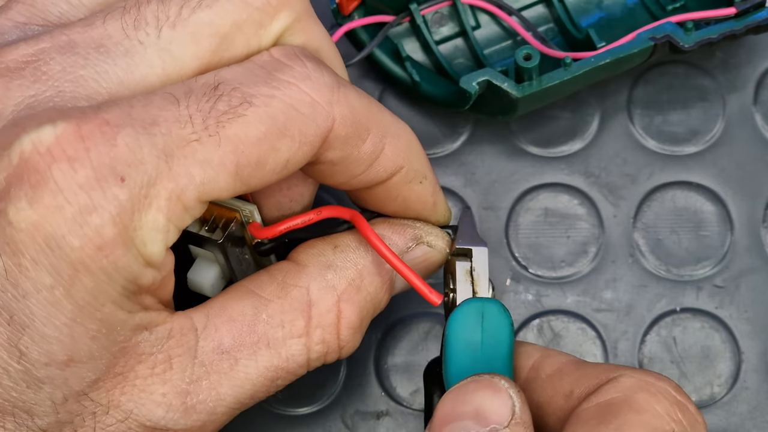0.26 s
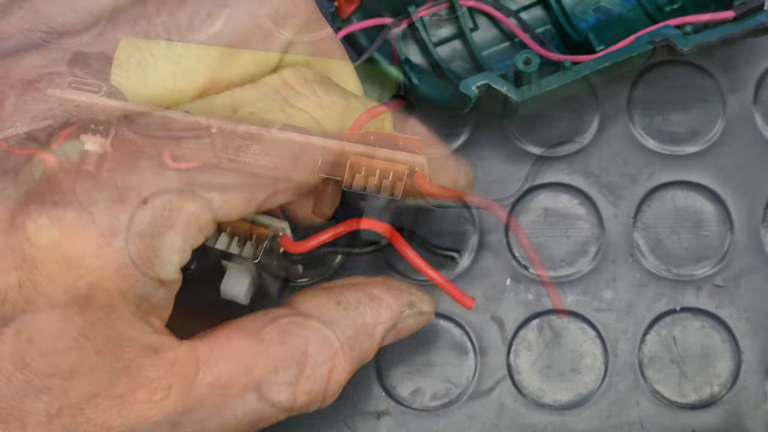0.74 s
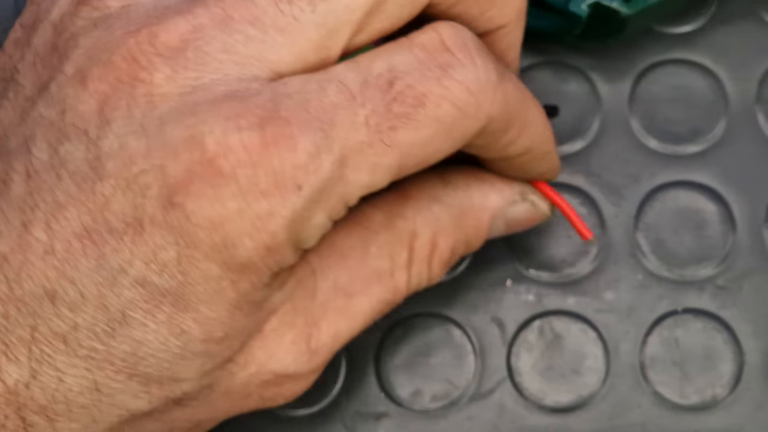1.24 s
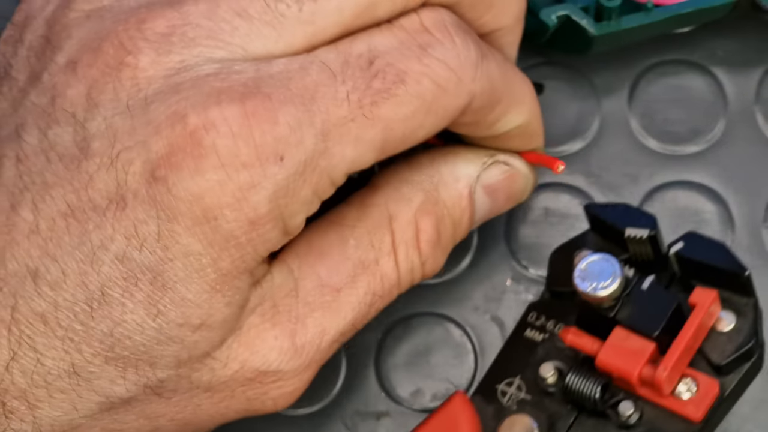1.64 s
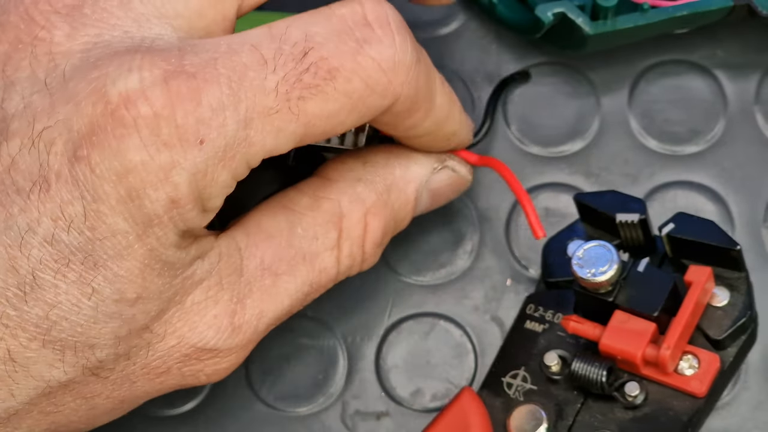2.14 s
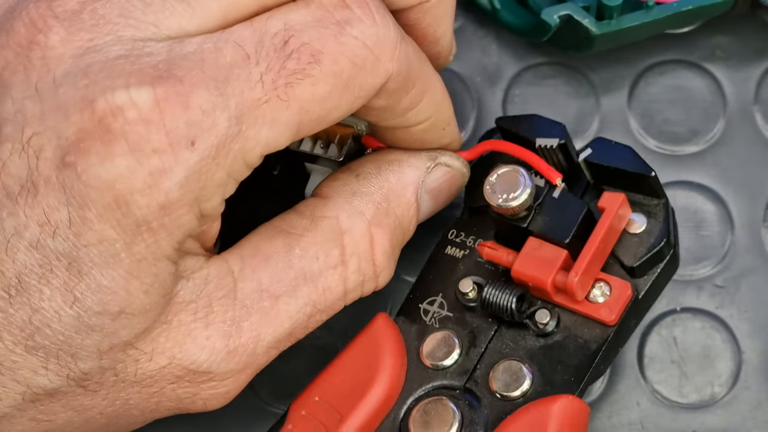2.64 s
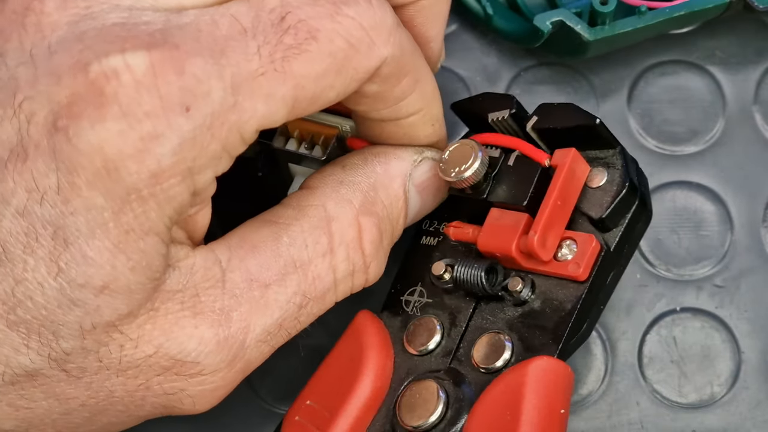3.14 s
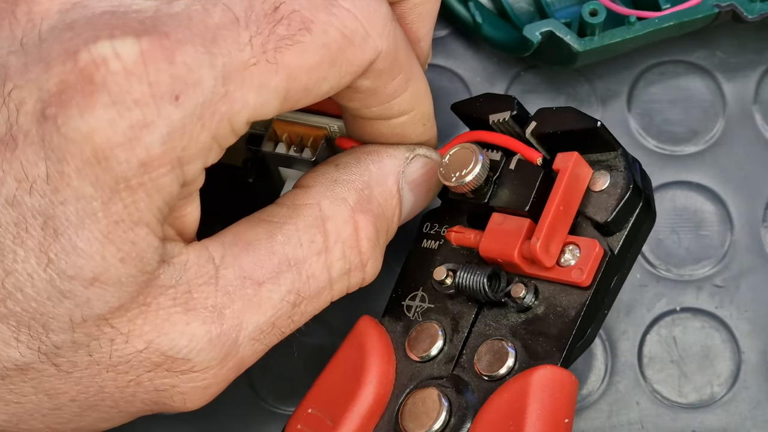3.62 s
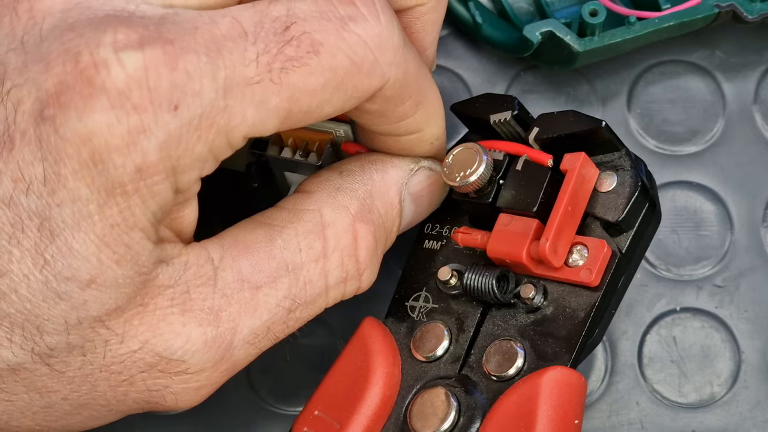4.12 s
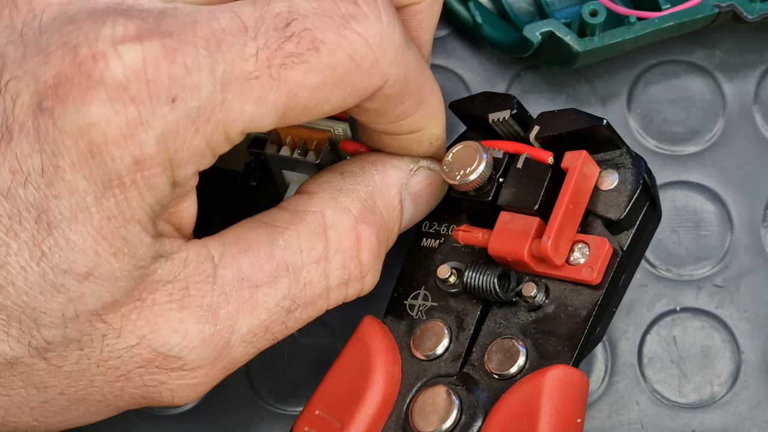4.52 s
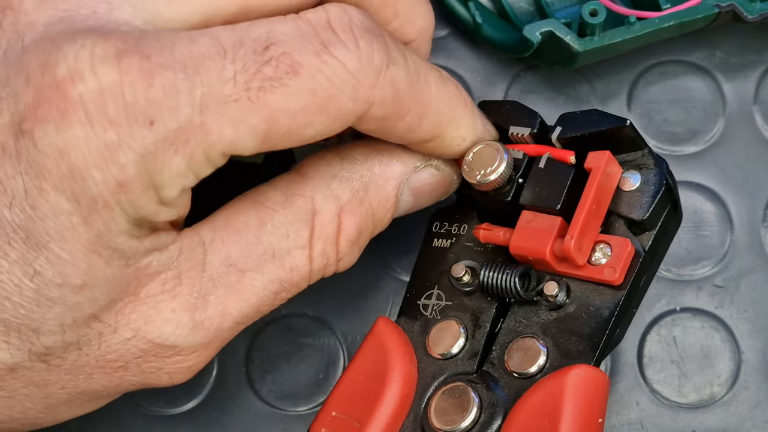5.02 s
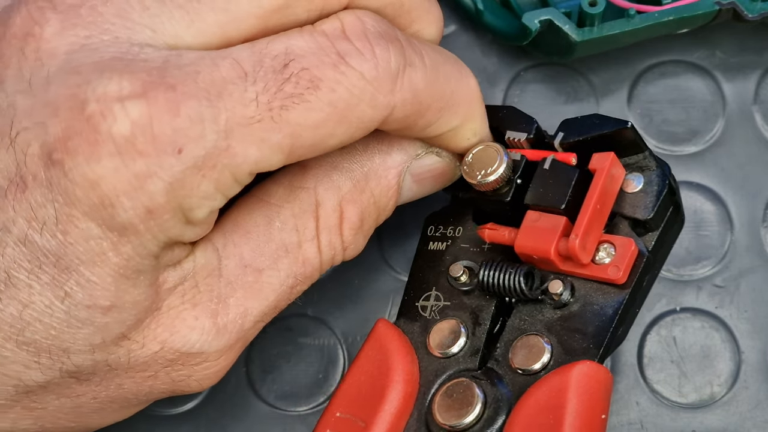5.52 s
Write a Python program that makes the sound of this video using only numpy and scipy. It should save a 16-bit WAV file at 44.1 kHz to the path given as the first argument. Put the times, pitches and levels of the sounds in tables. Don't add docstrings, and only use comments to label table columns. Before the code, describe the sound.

A close stereo microphone hears one crisp cutter snap, then skin and plastic rubbing on rubber, low bench thumps, rustling leads and tiny metal ticks. Midway comes a sharp multiple clack of stripper jaws, followed by near stillness with small spring pings, and finally a violent short snap with rattling steel. Bright reverberation follows the strokes; the steady fan hum and hiss dip after each and slowly return.

```python
import sys
import numpy as np
from scipy import signal
from scipy.fft import rfft, irfft, next_fast_len
from scipy.io import wavfile
from scipy.ndimage import uniform_filter1d, map_coordinates

SR = 44100
rng = np.random.default_rng(int(sys.argv[2]) if len(sys.argv) > 2 else 0)


def level_to_linear(level):
    exponent = np.asarray(level, float) / 20
    return 10 ** exponent


def materialize(psi):
    bounded = np.clip(np.atleast_2d(psi).T, -1, 1)
    quanta = np.round(bounded * 32767).astype(np.int16)
    wavfile.write(sys.argv[1], SR, quanta)


N = 254456

# t/s, peak/dB, ring f/Hz, t60/s, crack level/dB
CUT_HITS = [(.4075, -42, 5300, .04, 2), (.4158, -31, 5440, .012, -2), (.4355, -13, 3996, .01, -14),
            (.4404, -3.5, 4980, .006, 2), (.4425, -14, 4696, .03, -4.5), (.4505, -23, 5110, .012, -3.5),
            (.4555, -21, 4900, .012, -5.5), (.4625, -19, 4800, .01, -6), (.4725, -28, 2100, .04, -7.5),
            (.483, -26, 8500, .06, 3)]
# t/s, peak/dB, ring f/Hz, left-right/dB, crack level/dB
CLAMP_HITS = [(3.0925, -33, 5280, 8.5, -8.5), (3.0965, -29, 3750, 6, -9), (3.1005, -21, 6010, 6, -2),
              (3.1048, -7.5, 2462, 1, -7), (3.1058, -14.5, 6300, 6, 0.5), (3.1089, -11, 5060, 6, 3),
              (3.1122, -5.5, 3720, 6.0, 4), (3.1128, -10.5, 7300, 6, -3.5), (3.1168, -17.5, 2450, 2, 1.5),
              (3.1175, -14.5, 7450, 5, -4), (3.1215, -21.5, 2500, 2, 2.5), (3.1485, -30.5, 7500, 4.5, 1),
              (3.153, -34.5, 2700, 4, 1)]
# t/s, peak/dB, ring f/Hz, left-right/dB, crack level/dB
TEAR_HITS = [(5.6227, -0.5, 6120, 3.5, -9.5), (5.6258, -14.5, 6900, 3, -4), (5.634, -16, 1398, 0.5, -2),
             (5.638, -10, 5246, 5, -3.5), (5.6446, -4.5, 6300, 1.5, 5.5), (5.6492, -7, 3247, 3.5, 5),
             (5.6523, -13.5, 3284, 3.5, 1.5), (5.6548, -15.5, 1786, 2, 2.5), (5.6575, -9.5, 3586, 1.5, 6),
             (5.661, -24, 2395, 2, 2)]
# t/s, peak/dB, ring f/Hz, left-right/dB, crack level/dB
TICK_HITS = [(0.0169, -55, 2630, 13, -9), (.738, -50, 14000, 1, 8), (.8255, -48, 2700, 2, 0),
             (0.9512, -39, 8400, 8, -3.5), (1.1164, -51, 2800, 2, 3), (1.2685, -35.5, 12500, 3.5, -8),
             (1.505, -25, 6040, 1, 4), (1.511, -36, 7550, 2, -2), (2.1735, -40.5, 5800, 12, 0),
             (2.179, -47, 4800, 6, 0), (2.1944, -37, 6400, 10, -5), (2.3491, -47, 3020, 3, 1),
             (2.37, -32, 5430, 1, 19), (2.1948, -47, 13500, 3, 0), (2.3705, -45, 13500, 1, 0),
             (2.7027, -47, 13000, 2, 0), (2.479, -47, 6500, 3, 2.5), (2.4708, -42, 3010, 6.5, -2),
             (2.7023, -41.5, 5040, 4.9, 12), (2.7945, -46, 4150, 14, 13), (2.8525, -41, 2970, 10.5, -2),
             (2.8564, -34, 3500, 10, 9), (2.864, -41, 2860, 10.5, -3), (3.0006, -32, 3234, 3, -1),
             (5.0499, -46, 7800, 3, 3), (5.054, -50, 6200, 3, 0), (5.5223, -37, 5100, 13.5, -10),
             (5.5524, -55, 3000, 10, -1)]
# t/s, peak/dB, ring f/Hz, t60/s, crack level/dB
BUMP_HITS = [(1.7873, -20.5, 3300, 0.025, 5), (2.022, -46, 2200, .03, -3), (2.033, -42, 3400, .02, 0),
             (2.0373, -35.5, 3430, 0.023, -2), (2.043, -38.5, 3030, 0.036, 2.5),
             (.737, -44, 1380, 0.027, -11.5), (4.7336, -37.5, 2948, 0.013, 4), (4.7365, -46, 5200, .015, 1),
             (4.925, -53, 2930, .015, -3), (4.9265, -56, 4800, 0.013, -3), (5.7435, -23, 3100, .012, 4),
             (5.7465, -31, 2660, .025, 7)]
# t/s, peak/dB, long ring level/dB, damping (1 = free)
SPRING_SLIPS = [
    (4.9975, -33, 4, 2.3),
    (5.028, -57, 6, 1.7),
    (5.2029, -34.5, 1, 0.97),
    (5.309, -58, 18, 0.9),
    (5.36, -71, 0, 1.34),
]
# t/s, level/dB, rise/(dB per ms), fall/(dB per ms), left-right/dB
STROKE_SWELLS = [
    (.4375, -10, 1.9, 8.5, 13),
    (3.1125, -13, 2, 3, 5),
    (5.6235, -15, 3, 2.5, 1.5),
    (5.649, -25.5, 0.73, 1.35, 4.5),
    (.424, -36.5, 2.1, 2.5, 6),
]
# f/Hz, width/Hz, level/dB
JAW_MODES = [(1360, 170, -17), (2450, 270, -4.5), (3750, 200, -3.5), (4980, 340, -3.5), (6360, 96, -1),
             (7660, 390, -5), (9000, 260, -7), (13500, 189.8, -20.5), (15000, 210, -16)]
# f/Hz, level/(dB per Hz)
CRACK_TINT = [(180, -56.5), (300, -17.5), (994, -10.5), (1230, -4), (1840, -8), (2100, -5), (6000, -4),
              (13100, -8), (15000, -4.5), (16000, -16)]
# f/Hz, level/(dB per Hz)
CLICK_TINT = [(300, -2.5), (1200, -6), (2300, -5.5), (4000, 3.5), (7000, -3), (9500, -25), (15000, -16.5)]
# f/Hz, level/(dB per Hz)
SCRAPE_TINT = [(180, -29), (300, -5), (480, -9), (750, -11), (1000, -16), (1250, -11.5), (1600, -12),
               (2100, -8.5), (2500, -16), (5000, -28), (6500, -51.5), (11000, -120)]


def unit(x):
    return x / np.sqrt(np.mean(x ** 2) + 1e-20)


def along(points, hz):
    f, v = np.transpose(points)
    return np.interp(np.log(hz + 1), np.log(f + 1), v)


def colour(spectrum):
    return lambda hz: level_to_linear(along(spectrum, hz))


def resonant(modes):
    def response(f):
        total = 0
        for k, (centre, width, db) in enumerate(modes):
            band = 1j * f * width
            total = total + (-1) ** k * level_to_linear(db) * band / (centre ** 2 - f ** 2 + band)
        return total
    return response


def filtered(x, response):
    m = next_fast_len(x.shape[-1] + 8192)
    return irfft(rfft(x, m) * response(np.fft.rfftfreq(m, 1 / SR)), m)[..., :x.shape[-1]]


def wobble(rate):
    knots = rng.standard_normal(int(N * rate / SR) + 4)
    return map_coordinates(knots, [np.arange(N) * rate / SR])


def patches(shape, bins, frames):
    lumps = uniform_filter1d(rng.standard_normal(shape), size=bins, axis=0)
    return unit(uniform_filter1d(lumps, size=frames, axis=1))


def rush(gain, alike, patchy_db):
    z = signal.stft(rng.standard_normal((2, N)), nperseg=512)[2]
    field = patches(z.shape[1:], bins=6, frames=10)
    pair = signal.istft(z * level_to_linear(patchy_db * field), nperseg=512)[1][:, :N]

    def mid_side_gain(hz):
        angle = np.arccos(np.clip(along(alike, hz), -1, 1)) / 2
        return gain(hz) * np.array([np.cos(angle), np.sin(angle)])

    mid, side = filtered(pair, mid_side_gain)
    return unit(np.array([mid + side, mid - side]))


def swells(rows, half_s):
    t = np.arange(N) / SR
    return sum(level_to_linear(db) * np.exp(-((t - s) / half_s) ** 2) for s, db in rows)


def add(track, s, sound):
    part = track[:, round(s * SR):][:, :sound.shape[1]]
    part += sound[:, :part.shape[1]]


def sides(pan_db):
    return level_to_linear([[pan_db / 2], [-pan_db / 2]])


def left_first(pair, samples):
    return np.array([pair[0], np.roll(pair[1], samples)])


def contacts(rows, crack_tint, spread, attack, **shared_by_all):
    out, t = np.zeros((2, N)), np.arange(SR // 16) / SR
    own = [name for name in ("t60", "pan_db", "crack_db") if name not in shared_by_all]
    for s, db, hz, *rest in rows:
        hit = {**shared_by_all, **dict(zip(own, rest))}
        shared, left, right = rng.standard_normal((3, len(t)))
        blow = shared + np.array([left, right])
        mode = resonant([(hz, spread * hz, 0)])
        ring = unit(filtered(blow, lambda f: mode(f) ** 2))
        crack = level_to_linear(hit["crack_db"]) * unit(filtered(blow, colour(crack_tint)))
        sound = (ring + crack) * level_to_linear(-60 * t / hit["t60"]) * (1 - np.exp(-t / attack)) ** 2
        peak = np.abs(sound).max(axis=1, keepdims=True)
        add(out, s - attack, level_to_linear(db) * sound / peak * sides(hit["pan_db"]))
    return out


def stroke_swell(stroke, modes, grit_db):
    s, db, rise, fall, pan_db = stroke
    out, ms = np.zeros((2, N)), np.arange(-SR // 20, SR // 20) / SR * 1000
    shared, left, right = rng.standard_normal((3, len(ms)))
    burst = shared + 0.49 * np.array([left, right])
    grit = level_to_linear(grit_db) * unit(filtered(burst, colour(CRACK_TINT)))
    swell = unit(filtered(burst, resonant(modes))) + grit
    add(out, s - 1 / 20, swell * level_to_linear(db + np.minimum(rise * ms, -fall * ms)) * sides(pan_db))
    return out


def cutter():
    # f/Hz, width/Hz, level/dB
    cutter_modes = [(2270, 150, -21.5), (4100, 130, -13), (4612, 120, -7), (5550, 110, 0), (8610, 83, -1),
                    (11400, 580, -23), (13900, 360, -24), (15200, 160, -12.5)]
    swell = stroke_swell(STROKE_SWELLS[0], cutter_modes, grit_db=-15) + stroke_swell(STROKE_SWELLS[4], cutter_modes, grit_db=-5)
    return swell + contacts(CUT_HITS, CRACK_TINT, spread=0.1, attack=0.00082, pan_db=-2)


def clamp():
    # f/Hz, level/(dB per Hz)
    clamp_tint = [(180, -59), (300, -26.5), (1340, -11.5), (1870, -20), (2440, -1), (2790, -7.5),
                  (7200, -8.5), (16000, -27.5)]
    strikes = contacts(CLAMP_HITS, clamp_tint, spread=0.07, attack=0.00089, t60=0.014)
    return stroke_swell(STROKE_SWELLS[1], JAW_MODES, grit_db=-11) + strikes


def tear():
    # f/Hz, width/Hz, level/dB
    slide_modes = [(1680, 300, -11), (4760, 140, -10), (6230, 190, -1), (6940, 43, -6), (7300, 240, -4.5),
                   (8200, 120, -11), (10700, 200, -19.5), (15200, 190, -24)]
    rip = stroke_swell(STROKE_SWELLS[2], slide_modes, grit_db=-18.5)
    rattle = stroke_swell(STROKE_SWELLS[3], JAW_MODES, grit_db=3.5)
    snap = contacts(TEAR_HITS[:1], CRACK_TINT, spread=0.2, attack=0.00035, t60=0.006)
    strikes = contacts(TEAR_HITS[1:], CRACK_TINT, spread=0.11, attack=0.00037, t60=0.011)
    return rip + rattle + plate() + snap + strikes


def plate():
    out, t = np.zeros((2, N)), np.arange(SR // 8) / SR
    ring = unit(filtered(rng.standard_normal((2, len(t))), resonant([(2154, 70, 0)])))
    level = level_to_linear(-37 - 60 * t / 0.28)
    add(out, TEAR_HITS[-1][0], ring * level * (1 - np.exp(-t / 0.015)))
    return out


def ticks():
    return contacts(TICK_HITS, CLICK_TINT, spread=0.18, attack=0.00041, t60=0.013)


def bumps():
    # f/Hz, level/(dB per Hz)
    bump_tint = [(300, -9), (1200, -6), (2300, -3), (3600, 2.5), (5500, -1.5), (8000, -9), (9500, -20),
                 (15000, -26)]
    return contacts(BUMP_HITS, bump_tint, spread=0.25, attack=0.00033, pan_db=3)


def spring():
    # f/Hz, level/dB, t60/s
    coil_modes = [(1674, -7, 0.18), (2420, -0.5, 0.033), (3505, 10, 0.031), (4220, -6.5, 0.032),
                  (5110, -2.5, 0.031), (5580, -4, 0.039), (6170, -5, 0.018), (2290, -21, 0.18),
                  (2505, -16, 0.12), (3630, -22.5, 0.15), (3340, -21, 0.18), (3680, 5, 0.022),
                  (7300, -8, .015)]
    out, t = np.zeros((2, N)), np.arange(SR // 3) / SR
    for s, db, long_db, damping in SPRING_SLIPS:
        ring = np.zeros(len(t))
        for hz, mode_db, t60 in coil_modes:
            strength_db = mode_db + rng.normal(0, 1) + long_db * (t60 > 0.1)
            wave = np.sin(2 * np.pi * (hz * t + rng.random()))
            ring += level_to_linear(strength_db - 60 * damping * t / t60) * wave
        noise = unit(filtered(rng.standard_normal((2, len(t))), colour(CLICK_TINT)))
        click = level_to_linear(-6 - 60 * t / 0.025) * noise
        add(out, s, level_to_linear(db - 2.5) * (ring + click) * (1 - np.exp(-t / 0.0016)) * sides(4.9))
    return out


def skids():
    # t/s, peak/dB, f/Hz, t60/s, grit level/dB
    skid_hits = [(1.05, -45, 920, 0.059, -15.5), (1.30, -31.5, 1790, 0.55, -11),
                 (1.325, -32, 1230, 0.17, -11), (1.412, -25, 1170, 0.1, -3), (1.424, -30, 1490, .05, 4),
                 (1.44, -29.5, 905, 0.08, -3), (1.452, -32, 1250, 0.069, 3), (1.63, -33, 680, 0.078, 4),
                 (1.787, -24.5, 500, 0.084, 8)]
    return contacts(skid_hits, SCRAPE_TINT, spread=0.45, attack=0.004, pan_db=3)


def knocks():
    # t/s, peak/dB, pitch f/Hz, t60/s, slap level/dB
    soft_knocks = [(0.7375, -16, 228, 0.044, -24), (0.774, -30.5, 167, 0.15, -23),
                   (0.824, -32, 150, 0.11, -23), (.882, -41.5, 194, 0.11, -24),
                   (1.049, -39, 93, 0.046, -14), (1.169, -28.5, 127, 0.14, -8.5),
                   (1.244, -26, 116, 0.038, -20), (1.296, -28, 191, 0.13, -12),
                   (1.364, -22.5, 90, 0.063, -27), (1.643, -29, 106, 0.05, -20),
                   (1.786, -29.5, 286, 0.077, -7), (2.259, -31.5, 210, 0.13, -21.5)]
    # t/s, peak/dB, pitch f/Hz, t60/s, slap level/dB
    tool_jolts = [
        (5.64, -35, 141, 0.14, -22),
        (5.645, -35.5, 42.6, 0.28, -35),
        (5.685, -39, 125, 0.22, -10),
        (5.72, -44.5, 138, 0.21, -20),
    ]
    slap_modes = resonant([(500, 220, -5.5), (1380, 340, -12.5)])
    out, t = np.zeros((2, N)), np.arange(SR // 4) / SR
    for s, db, hz, t60, slap_db in soft_knocks + tool_jolts:
        turn = 2 * np.pi * hz * t
        ring = np.sin(turn) + 0.47 * np.sin(1.59 * turn) + 0.2 * np.sin(2.4 * turn)
        slap = unit(filtered(rng.standard_normal((2, len(t))), slap_modes))
        sound = ring * level_to_linear(-60 * t / t60) + slap * level_to_linear(slap_db + 1 - 60 * t / 0.048)
        add(out, s, level_to_linear(db + 3) * sound * (1 - np.exp(-t / 0.0056)) * sides(1.5))
    return out


def hands():
    # t/s, effort level/dB
    effort = [(.8, -95), (.86, -61.5), (1.01, -57), (1.09, -49.5), (1.28, -40), (1.52, -41), (1.59, -42.5),
              (1.76, -44.5), (1.81, -44.5), (1.97, -50), (2.06, -49.5), (2.14, -53.5), (2.25, -55.5),
              (2.6, -59), (3.08, -59.5), (3.12, -90)]
    # t/s, level/dB
    shoves = [(1.09, -49), (1.23, -43.5), (1.42, -49), (1.52, -57), (1.59, -47), (1.67, -46.5), (1.81, -54),
              (2.06, -46), (2.17, -48.5), (2.28, -54), (2.58, -46)]
    # t/s, level/dB
    brushes = [(.963, -60), (1.33, -49), (1.43, -54), (1.53, -47), (1.62, -52), (2.05, -60.5),
               (2.185, -63.5), (2.83, -63)]
    # f/Hz, left-right likeness (1 = same)
    hands_alike = [(60, 0.94), (130, 0.93), (290, 0.82), (640, 0.5), (1410, 0.9), (3100, -0.29),
                   (6820, 0.43), (15000, -0.02)]
    # f/Hz, level/(dB per Hz)
    rub_tint = [(12, -39), (20, -10), (59, -11), (103, 1.5), (151, -7.5), (295, -5.5), (485, -19.5),
                (600, -12), (780, -42), (1320, -120)]
    # f/Hz, level/(dB per Hz)
    rustle_tint = [(1470, -31.5), (2700, -2.5), (4840, -7.5), (7530, -7.5), (9300, -12), (10800, -23),
                   (12200, -18), (16000, -19)]
    times, levels = np.transpose(effort)
    effort_db = np.interp(np.arange(N) / SR, times, levels)
    jerk = level_to_linear(1.2 * wobble(60))

    rub_noise = unit(level_to_linear(2.5 * wobble(25)) * rush(colour(rub_tint), hands_alike, patchy_db=1.5))
    rub = (level_to_linear(effort_db - 6.5) + swells(shoves, half_s=0.036)) * rub_noise

    scrape = level_to_linear(effort_db - 0.4) * unit(jerk * rush(colour(SCRAPE_TINT), hands_alike, patchy_db=0.8))

    top_db = effort_db.max()
    rustle_db = -9.5 + top_db + 0.78 * (effort_db - top_db)
    rustle_noise = unit(jerk * rush(colour(rustle_tint), hands_alike, patchy_db=1.5))
    rustle = (level_to_linear(rustle_db) + swells(brushes, half_s=0.038)) * rustle_noise
    return (rub + scrape + rustle) * sides(1.5)


def echo(rows, wet_db, tint):
    # f/Hz, t60/s
    shop_decay = [(300, 0.77), (800, 0.39), (2100, 0.75), (3100, .65), (4400, 0.75), (5800, .68),
                  (10000, 0.54), (14600, .4)]
    out = np.zeros((2, N))
    for s, db, *_ in rows:
        hz, t, z = signal.stft(rng.standard_normal((2, SR * 2 // 3)), SR, nperseg=256)
        lumps_db = 2.5 * patches(z.shape[1:], bins=12, frames=4)
        decay_db = -60 * t / along(shop_decay, hz)[:, None]
        level = level_to_linear(lumps_db + along(tint, hz)[:, None] + decay_db)
        tail = signal.istft(z * level, SR, nperseg=256)[1]
        onset = 1 - np.exp(-np.arange(tail.shape[1]) / SR / 0.016)
        add(out, s, level_to_linear(db + wet_db) * tail * onset * sides(1.2))
    return out


def walls():
    # f/Hz, level/dB
    cut_tint = [(300, -21), (1000, -15), (2000, -5.5), (2900, -10), (3600, -4), (4300, 2.5), (5100, -6.5),
                (6500, -6.5), (9000, -9.5), (15000, -16)]
    # f/Hz, level/dB
    tear_tint = [(300, -25), (900, -22), (1300, -2), (2200, 3), (4000, -4.5), (6000, -5), (8000, -6),
                 (10500, -15.5), (15000, -11)]
    # f/Hz, level/dB
    small_tint = [(300, -34.5), (1200, -15.5), (1700, -9.5), (2100, 1.5), (4000, -1), (6000, -8.5),
                  (8000, -5), (10500, -20), (15000, -16)]
    strokes = echo(CUT_HITS, wet_db=-14, tint=cut_tint) + echo(CLAMP_HITS, wet_db=-30, tint=small_tint)
    strokes += echo(TEAR_HITS, wet_db=-27.5, tint=tear_tint)
    return strokes + echo(TICK_HITS + BUMP_HITS + SPRING_SLIPS, wet_db=-22.5, tint=small_tint)


def ducking():
    # t/s, depth/dB, recovery/s, fall/s
    ducks = [
        (-.3, 5, 0.86, .046),
        (.44, 14.5, 0.49, 0.041),
        (3.11, 13.5, 2.05, 0.11),
        (5.63, 15, 2, .046),
    ]
    gain_db = np.zeros(N)
    for s, depth_db, recovery_s, fall_s in ducks:
        since = np.maximum(np.arange(N) / SR - s, 0)
        gain_db -= depth_db * (1 - np.exp(-since / fall_s)) * np.exp(-since / recovery_s)
    return gain_db


def workshop():
    # f/Hz, width/Hz, level/dB
    boom_modes = [(98, 29, 0)]
    # t/s, level/dB
    leans = [(.05, -62.5), (.39, -56), (.79, -41), (.95, -48), (1.09, -40), (1.19, -42), (1.33, -38),
             (1.44, -53), (1.66, -39.5), (1.91, -45), (2.04, -45), (2.21, -47), (2.43, -51), (2.66, -52.5),
             (2.88, -49), (2.99, -46.5), (3.8, -53), (3.94, -57), (4.1, -54), (4.61, -45), (4.94, -52),
             (5.37, -56), (5.67, -38)]
    # f/Hz, left-right likeness (1 = same)
    air_alike = [(25, 0.41), (60, 0.26), (300, 0.77), (640, .3), (1400, 0.0042)]
    # f/Hz, level/(dB per Hz)
    murmur_tint = [(12, -19.5), (25, -10.5), (60, -17.5), (150, -22), (230, -18.5), (380, -15.5),
                   (440, -26.5), (540, -18.5), (640, -24), (900, -31.5), (1500, -41.5), (3300, -120)]
    # f/Hz, level/(dB per Hz)
    hiss_tint = [(530, -29.5), (900, -7), (1700, -1.5), (2420, -8), (4150, -12), (7770, -16), (8500, -23.5),
                 (9300, -26), (9700, -32), (11300, -33), (11800, -22), (16000, -23)]
    gain_db = ducking()

    phase = 2 * np.pi * np.cumsum(298 + 1.6 * wobble(12)) / SR
    tone = level_to_linear(-48.5 + gain_db + 2.5 * wobble(17)) * np.sin(phase) * sides(1.2)

    thrum = rush(lambda f: resonant(boom_modes)(f) ** 2, [(100, 0.96)], patchy_db=-0.5)
    envelope = np.abs(signal.hilbert(thrum.sum(axis=0), next_fast_len(N))[:N])
    thrum = unit(thrum / (envelope + 0.32) ** 0.57)
    boom = (level_to_linear(-49.5 + gain_db) + swells(leans, half_s=0.025)) * thrum * sides(1.2)

    murmur = level_to_linear(-50.5 + gain_db) * rush(colour(murmur_tint), air_alike, patchy_db=2) * sides(1.5)
    hiss_db = -60 + 0.8 * gain_db
    hiss = level_to_linear(hiss_db) * rush(colour(hiss_tint), air_alike, patchy_db=1.8) * sides(1.5)
    return tone + boom + murmur + hiss


def scene():
    stripper = clamp() + ticks() + bumps() + spring()
    bench = skids() + knocks() + hands() + workshop()
    tools = left_first(cutter(), -2) + left_first(stripper, 2) + left_first(tear(), 1)
    return tools + walls() + left_first(bench, 7)


def low_pass(x):
    return signal.sosfilt(signal.butter(12, 16300, fs=SR, output="sos"), x)


def record(dry):
    rounded = dry / (1 + np.abs(dry / 0.79) ** 8) ** (1 / 8)
    mix = filtered(rounded, lambda hz: hz < 15750)
    return low_pass(mix)


dry = scene()
out = record(dry)
materialize(out)
```